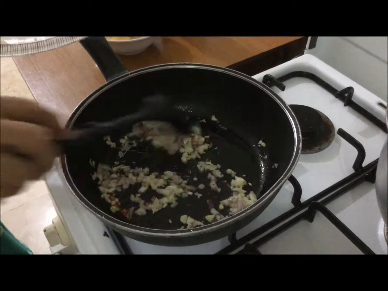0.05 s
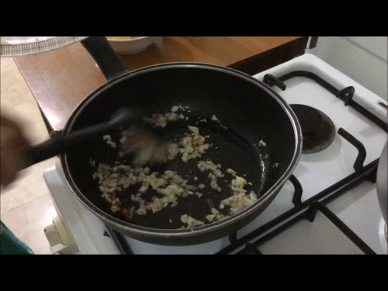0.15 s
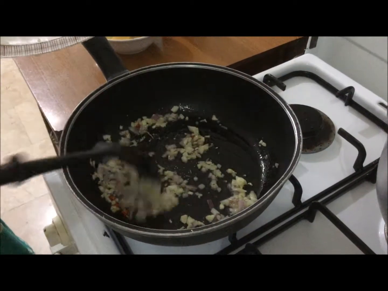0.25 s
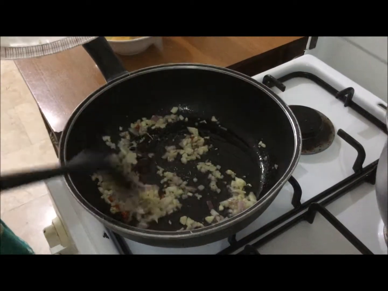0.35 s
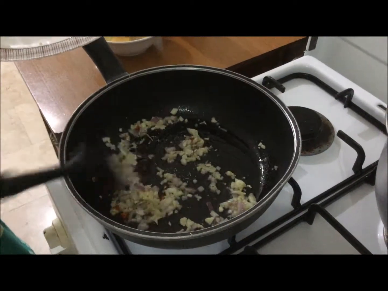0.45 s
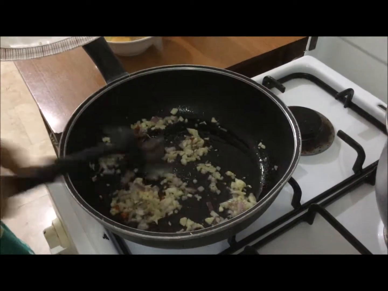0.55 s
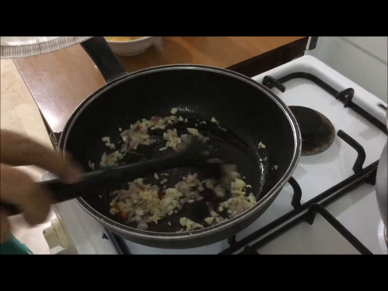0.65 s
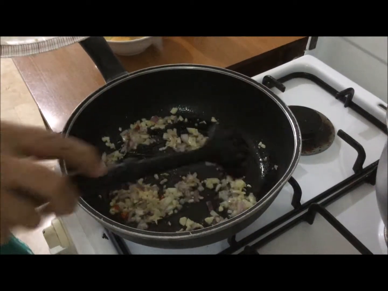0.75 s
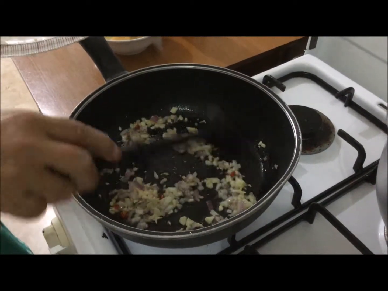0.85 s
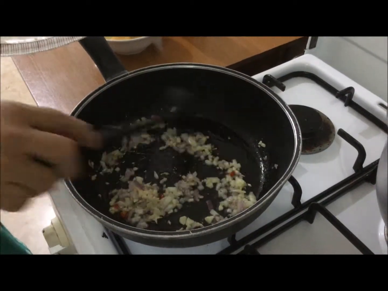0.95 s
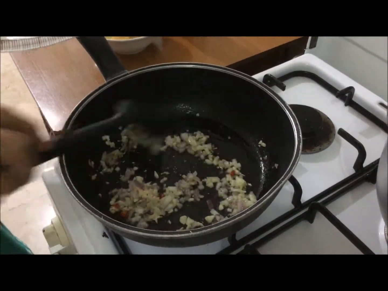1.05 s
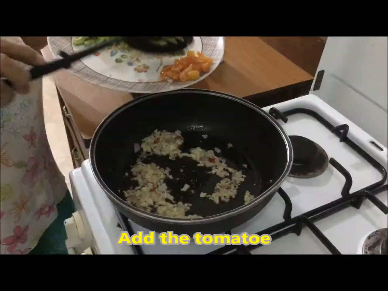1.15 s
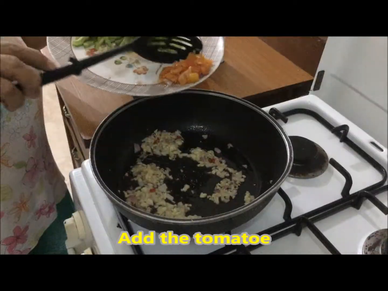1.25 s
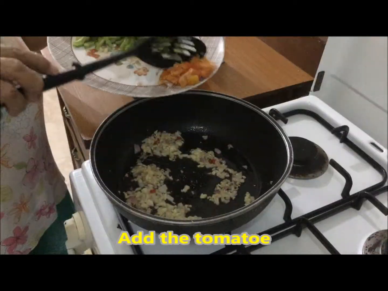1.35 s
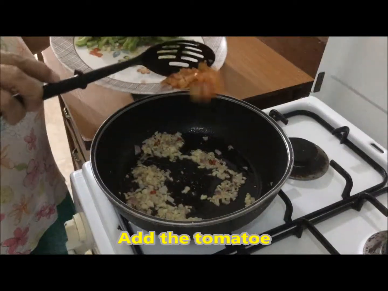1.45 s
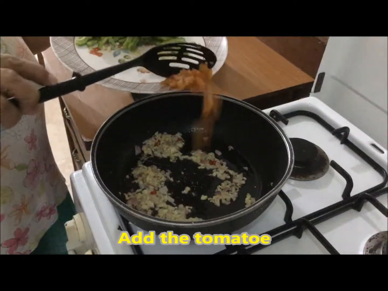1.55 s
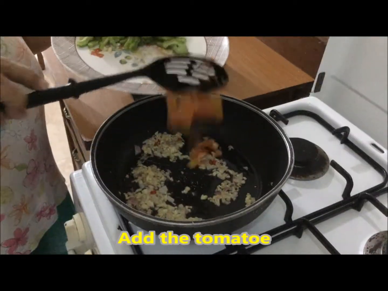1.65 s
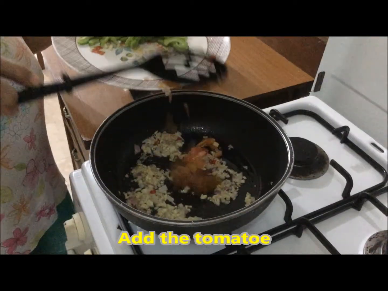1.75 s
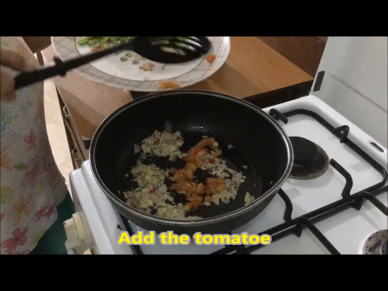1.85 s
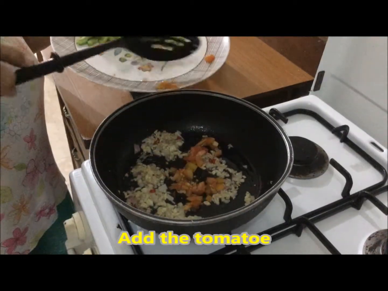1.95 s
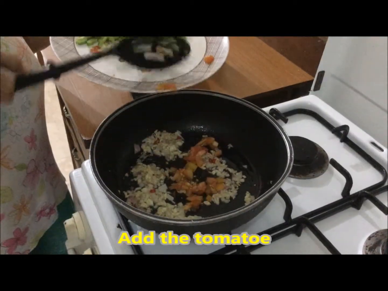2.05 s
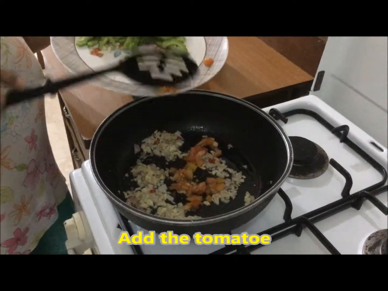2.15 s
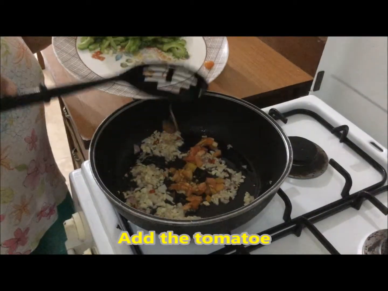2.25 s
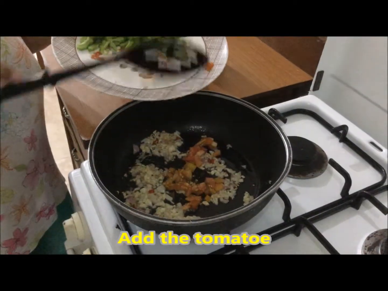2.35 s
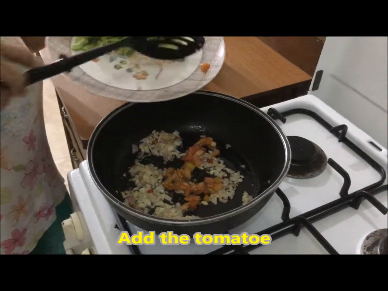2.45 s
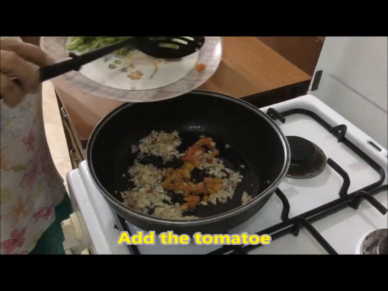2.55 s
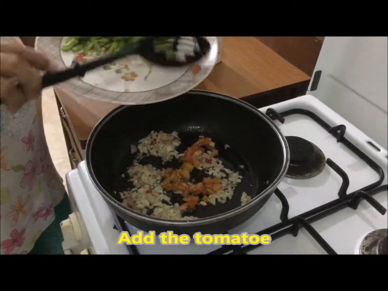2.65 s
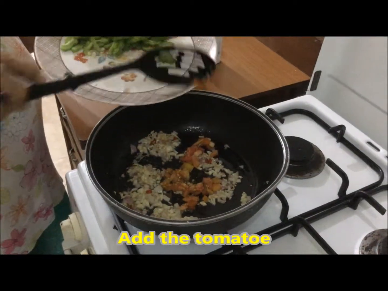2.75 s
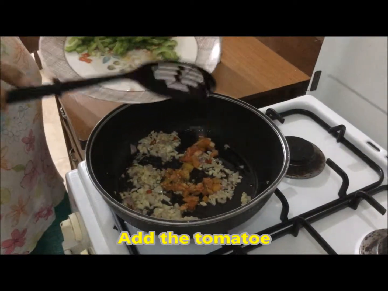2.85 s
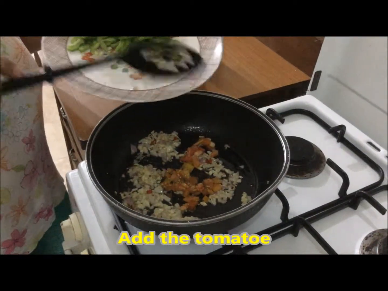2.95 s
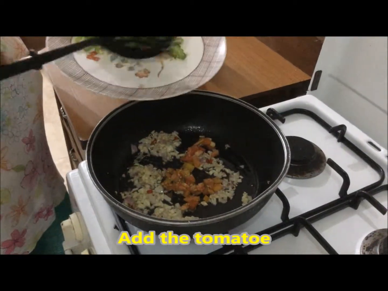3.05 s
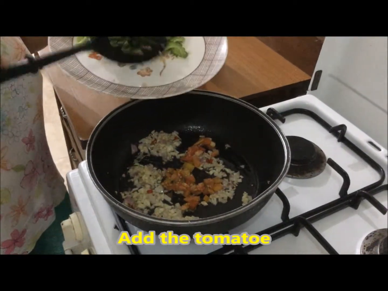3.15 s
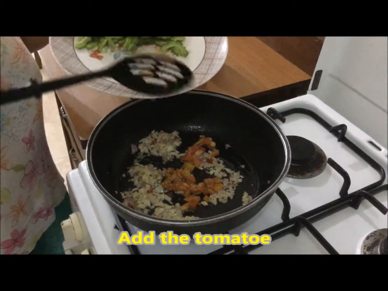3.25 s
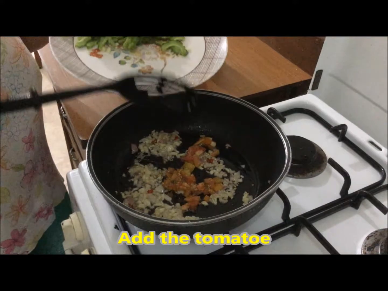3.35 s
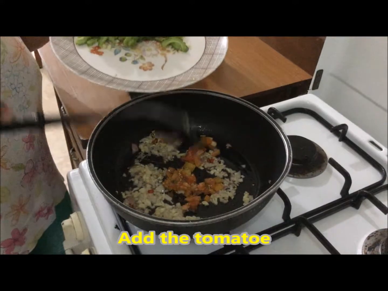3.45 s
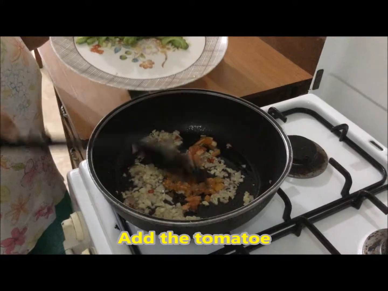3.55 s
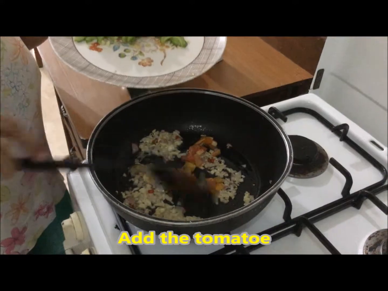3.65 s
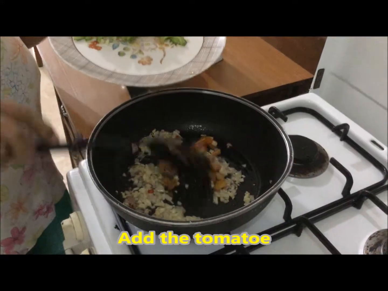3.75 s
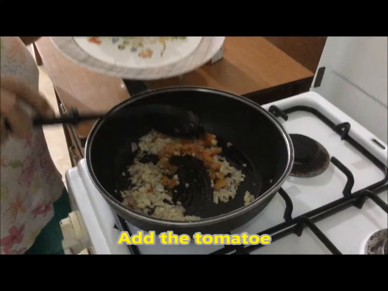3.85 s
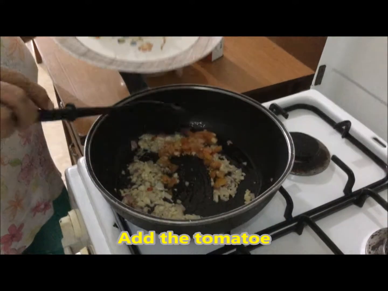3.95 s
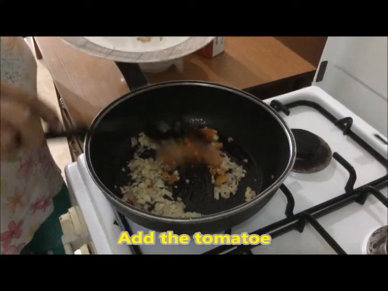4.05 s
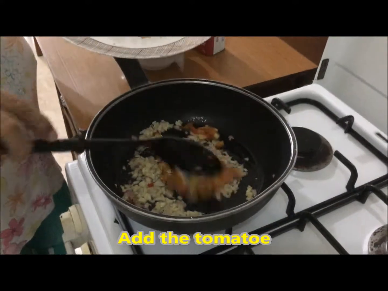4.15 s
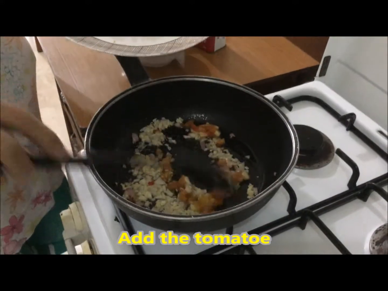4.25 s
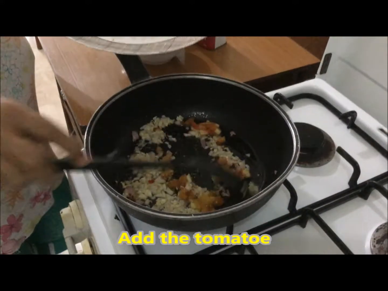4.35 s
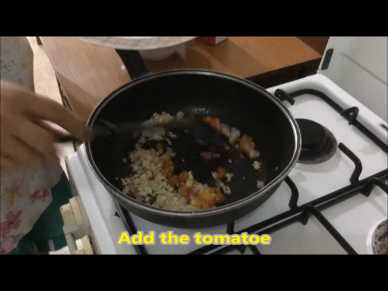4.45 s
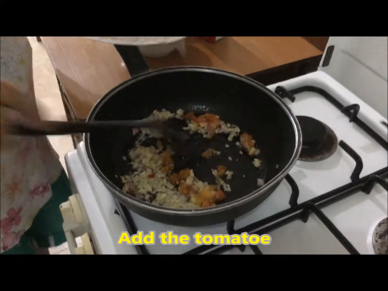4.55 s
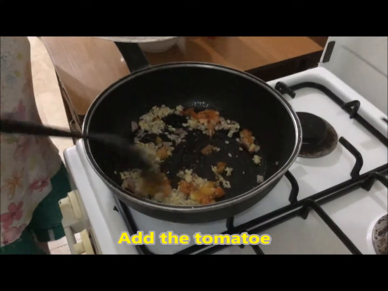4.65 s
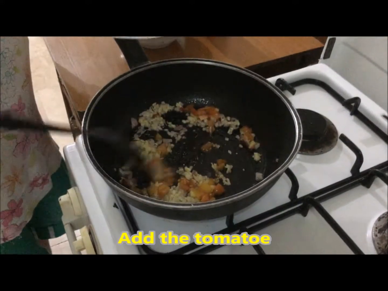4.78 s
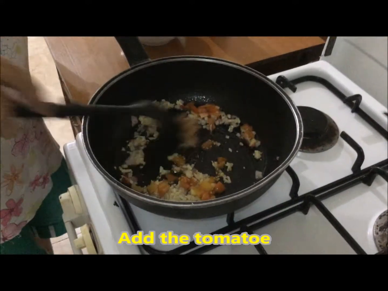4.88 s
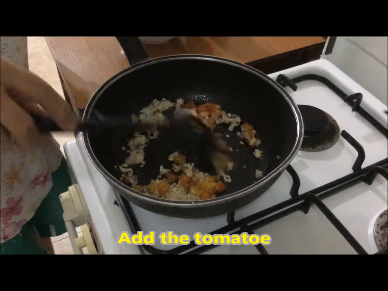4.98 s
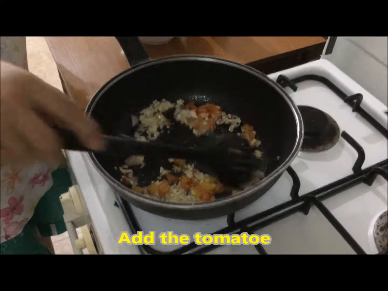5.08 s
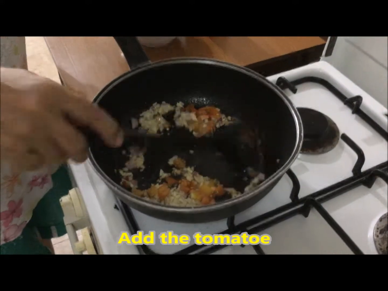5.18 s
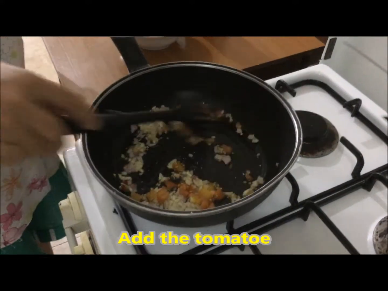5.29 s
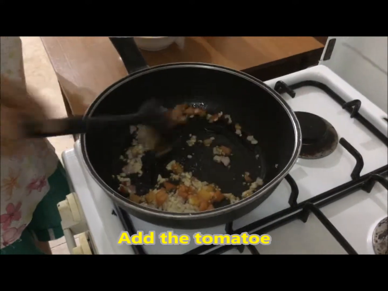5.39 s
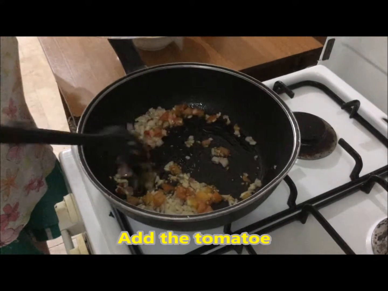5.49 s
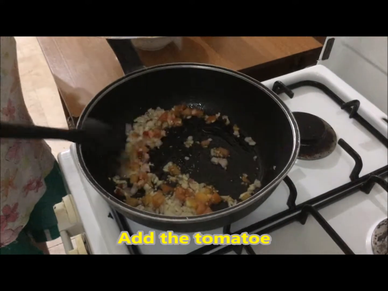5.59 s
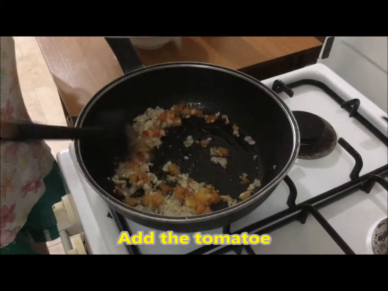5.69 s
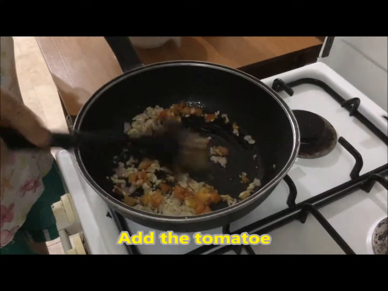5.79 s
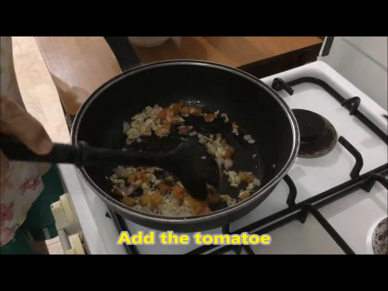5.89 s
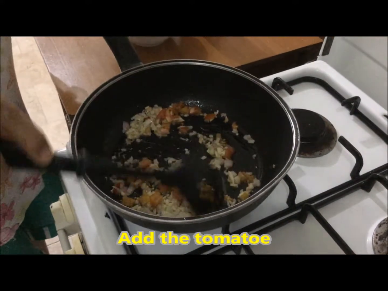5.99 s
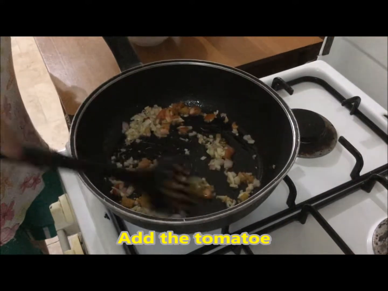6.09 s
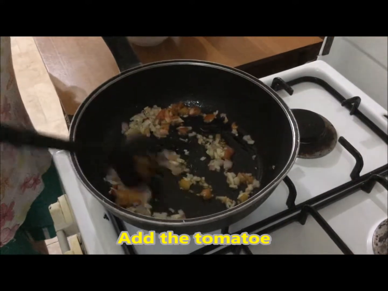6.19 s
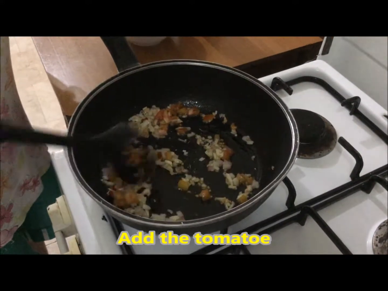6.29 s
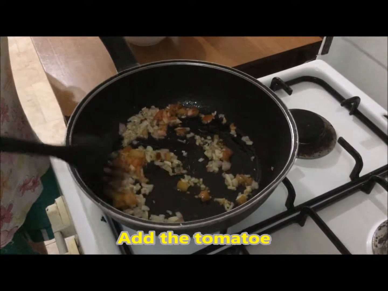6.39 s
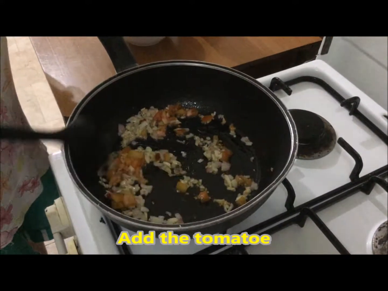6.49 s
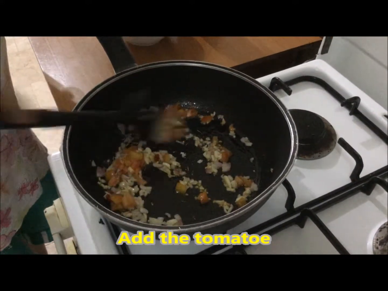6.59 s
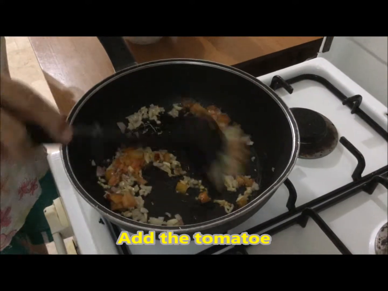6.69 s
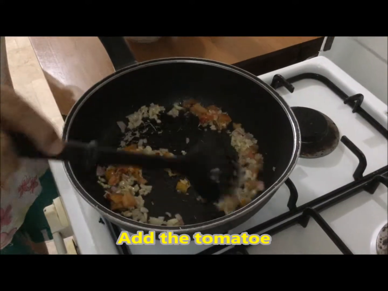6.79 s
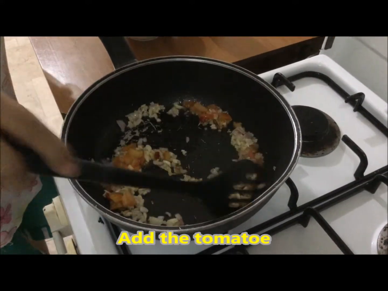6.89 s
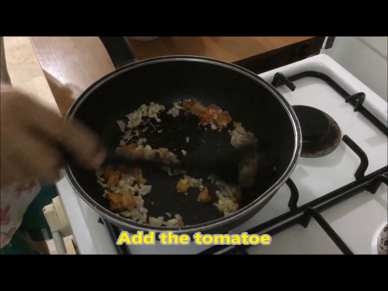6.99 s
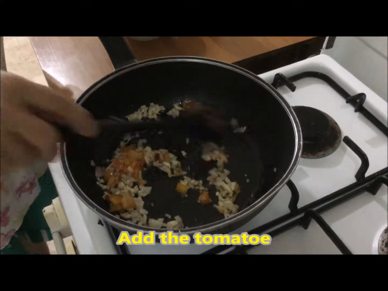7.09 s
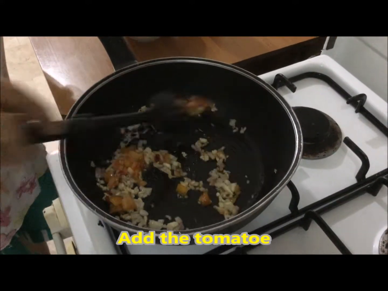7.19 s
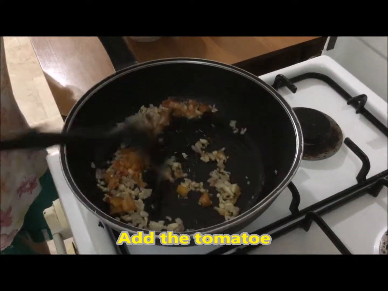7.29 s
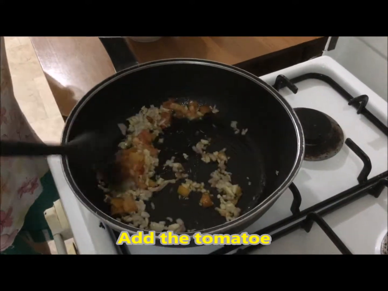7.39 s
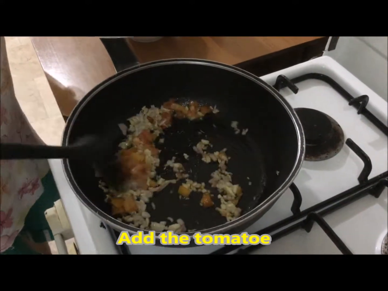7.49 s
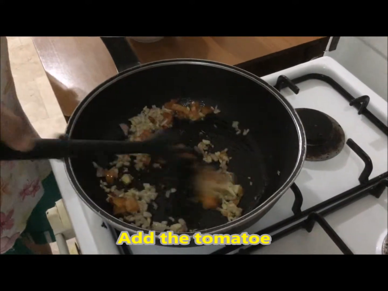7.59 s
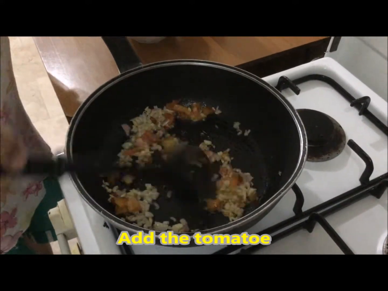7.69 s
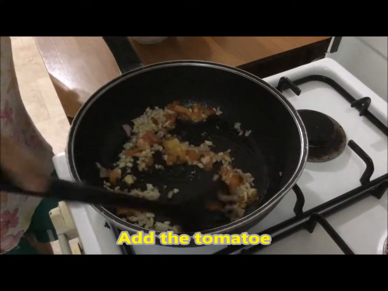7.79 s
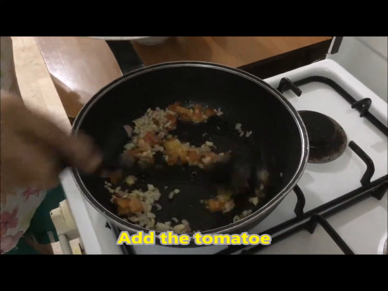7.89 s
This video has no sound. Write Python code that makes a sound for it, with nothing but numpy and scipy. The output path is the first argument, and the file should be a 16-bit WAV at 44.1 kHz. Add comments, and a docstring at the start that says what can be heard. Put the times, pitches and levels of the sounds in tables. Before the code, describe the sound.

Mono, close sound in a small home kitchen. From 0 s, onion and garlic sizzle finely in hot oil with bright, scattered spits; the spoon clacks at 0.5 s, and dull thuds and rubbing of the pan on its grate cluster around 0.9-1.1 s. At about 1.15 s sound almost vanishes, then stays thin and sparse, with a hard tap at 1.28 s. Around 1.9 s tomato lands: soft thuds, hollow juicy plops, and crackle rising again by 2.1 s, with a sharp knock there. Steady wet frying follows, another clack at 3.2 s and a cluster from 3.75 s. From 4 s the sizzle grows stronger, denser and crisper, fullest around 7 s, with loud snapping spits. Stirring knocks and grate scrapes come near 4.4, 4.8, 5.7, 6.5, 7.1 and 7.55 s. Faint low rumble swells beneath; tiny instants thin to watery tones. Frying continues to the end, near 8 s.

```python
"""Kitchen: chopped onion, garlic and tomato fry in hot oil in a deep pan; a plastic spoon stirs them.
Steam bubbles ring briefly as bright sizzle and crackle; juice burbles hollow, oil spits ring and crack.
The spoon strikes modes of the pan, which rubs on its grate; filtered noise rumbles below.
One microphone; now and then the sound thins to faint tones for an instant, and once it nearly stops."""
import sys
import numpy as np
from scipy import signal
from scipy.fft import rfft, irfft
from scipy.io import wavfile
from scipy.ndimage import uniform_filter1d

SR = 44100
rng = np.random.default_rng(int(sys.argv[2]) if len(sys.argv) > 2 else 0)


def boost_factor(decibels):
    """Convert a level in decibels to a linear amplitude factor."""
    exponent = np.asarray(decibels, float) / 20
    return 10 ** exponent


def file_out(sig):
    """Save sig as 16-bit WAV at sys.argv[1]."""
    # one column per channel
    cols = np.atleast_2d(sig).T
    # limit, then scale
    lim = np.clip(cols, -1, 1)
    pcm = np.round(lim * 32767).astype(np.int16)
    wavfile.write(sys.argv[1], SR, pcm)


N = 349713

# frying course: t/s, fine sizzle level/dB, juice burble level/dB
FRYING = [(0.0, -41, -56.5), (0.7, -41, -54), (0.95, -42.5, -61), (1.13, -41.5, -57), (1.19, -55.5, -67),
          (1.6, -55, -69), (1.9, -46.5, -59), (2.08, -47, -52.5), (2.56, -45, -50.5), (2.92, -43, -50),
          (3.12, -43.5, -48.5), (3.8, -41, -49), (4.2, -39, -46), (4.8, -35.5, -45.5), (5.1, -38.5, -45.5),
          (5.65, -35, -43.5), (6.1, -36.5, -44.5), (6.7, -36, -45.5), (6.95, -33.5, -43.5),
          (7.5, -34.5, -44.5), (7.93, -36, -46)]
# coarser crackle course: t/s, level/dB
CRACKLE_COURSE = [(0.0, -52), (0.62, -51), (0.99, -55.5), (1.1, -52), (1.3, -70.5), (1.72, -63),
                  (2.1, -53.5), (3.77, -49), (4.11, -45.5), (4.64, -45), (4.86, -44), (6.65, -44),
                  (6.93, -42), (7.35, -42), (7.93, -45)]
# spectra, relative density: f/Hz, level/dB (per Hz)
SIZZLE_SPECTRUM = [(3820, -29.5), (6500, -12), (7560, -11), (10100, -7), (13400, -1), (14700, -2),
                   (15700, -29.5)]
# as above, coarser crackle: f/Hz, level/dB (per Hz)
CRACKLE_SPECTRUM = [(1350, -25), (2300, -7.5), (2750, -8), (3040, 0.5), (3560, -2), (5200, -0.5),
                    (8500, -4), (11000, -31.5), (18700, -120)]
# as above, burble before the tomato lands: f/Hz, level/dB (per Hz)
ONION_SPECTRUM = [(250, -53), (420, -10.5), (550, -22), (635, -6), (704, -12), (850, -13.5), (1390, 2),
                  (2800, -4.5), (3640, -22), (6160, -120)]
# as above, burble once it has landed: f/Hz, level/dB (per Hz)
JUICE_SPECTRUM = [(250, -19), (420, -13), (469, -23), (591, -6.5), (768, -12), (1050, -10), (1110, -9.5),
                  (1330, -0.5), (1840, -5.5), (2550, -8.5), (2800, -11), (3640, -39), (6160, -120)]
# as above, pan rubbing on its grate: f/Hz, level/dB (per Hz)
GRATE_SPECTRUM = [(88, -33), (150, -4), (216, -2.5), (242, 9), (334, -20), (400, -2.5), (520, -70),
                  (880, -120)]
# spoon shoves the pan on its grate: start t/s, length/s, level/dB
SHOVES = [(0.0, 0.025, -65), (0.138, 0.11, -62), (0.59, 0.081, -55.5), (0.904, 0.061, -57),
          (1.037, 0.055, -66), (1.195, 0.086, -62.5), (1.32, 0.053, -66), (1.846, 0.093, -68),
          (2.116, .03, -64), (3.067, 0.04, -72), (3.187, 0.029, -67), (3.744, 0.12, -61), (4.4, 0.14, -56),
          (4.69, 0.037, -74), (4.82, 0.12, -51.5), (5.231, 0.044, -61), (5.73, 0.044, -55.5),
          (6.108, 0.053, -52.5), (6.475, 0.035, -54.5), (6.584, 0.077, -60), (6.733, 0.046, -63),
          (7.102, 0.036, -65), (7.4, 0.046, -69), (7.573, 0.058, -58), (7.9, 0.043, -54)]
# rumble noise bands: f/Hz, width/Hz, level/dB
RUMBLE_BANDS = [(74, 29, -65), (116, 55, -61.5), (180.5, 68, -70), (474, 19, -77.5), (760, 440, -72.5)]
# bass swells: centre t/s, width/s, lift of lowest band/dB, lift of next two/dB
SWELLS = [(0.09, 0.066, 2, 4), (0.95, 0.026, -2, 11), (1.95, 0.31, 10, 1.5), (2.9, 0.28, 7, 2.5),
          (3.87, 0.12, 7, 5.5), (4.5, 0.057, 11, 8), (4.97, 0.06, 17.5, -2), (5.87, 0.05, -10, 11),
          (6.85, 0.19, -3, 3), (7.11, 0.17, 7, 5), (7.65, 0.08, -8, 12), (7.76, 0.044, 10, 1),
          (7.92, 0.079, -9, 9)]
# large oil spits: t/s, peak level/dB, f/Hz, crack level/dB
SPITS = [(0.0529, -24, 12300, -47), (0.0607, -21, 12900, -57), (0.124, -27, 13400, -49),
         (0.2389, -28, 9400, -47), (0.2442, -25, 12100, -57), (0.2563, -30, 9500, -32),
         (0.3439, -14.5, 13000, -32), (0.3727, -19, 11400, -40), (0.3875, -26, 13000, -61),
         (0.4038, -22, 12600, -39), (0.4201, -23, 13000, -46), (0.4295, -31, 10300, -30),
         (0.4508, -26, 11700, -40), (0.4844, -21, 12400, -40), (0.5027, -21, 13400, -44),
         (0.5121, -20, 11700, -43), (0.5277, -22, 9800, -42), (0.6027, -25, 13000, -46),
         (0.6096, -23, 10700, -47), (0.6328, -25, 8500, -29), (0.6388, -25, 12700, -48),
         (0.6602, -25, 12000, -49), (0.7488, -24, 12300, -36), (0.8099, -15, 11900, -45),
         (0.9578, -26, 12000, -57), (1.1193, -24, 11600, -51), (1.2773, -45, 8600, -39),
         (1.2859, -29, 12800, -45), (1.6116, -35, 13500, -62), (1.6849, -24.5, 11800, -40.5),
         (1.7716, -34, 13000, -57), (1.8411, -33, 10800, -45), (1.8816, -32, 7060, -39),
         (1.8893, -38, 9200, -36), (1.917, -29, 12000, -62), (1.938, -39, 5500, -36),
         (1.9761, -33, 13600, -36), (2.0006, -33, 13100, -52), (2.0128, -39, 5600, -42),
         (2.0499, -40, 8900, -45), (2.0566, -22, 11700, -38), (2.0821, -38, 10900, -36),
         (2.0962, -25, 12600, -51), (2.1036, -30, 12700, -56), (2.1147, -32, 9200, -40),
         (2.1343, -28, 12400, -57), (2.2303, -29, 13100, -53), (2.2358, -30, 11900, -51),
         (2.2509, -30, 10600, -33), (2.2692, -29, 10100, -27), (2.2849, -28, 13100, -41),
         (2.335, -27, 11200, -43), (2.3973, -34, 9800, -57), (2.4273, -32, 9400, -50),
         (2.456, -22, 11800, -56), (2.4751, -28, 11000, -43), (2.4879, -31, 11100, -40),
         (2.5303, -40, 8800, -35), (2.5676, -30, 11200, -39), (2.6516, -28, 11700, -47),
         (2.7214, -27, 11300, -32), (2.7425, -27, 12100, -41), (2.7613, -30, 11800, -56),
         (2.7764, -30, 13700, -51), (2.816, -30, 11800, -46), (2.8303, -25, 11100, -38),
         (2.872, -29, 12200, -34), (2.88, -27, 11700, -55), (2.9162, -31, 13000, -54),
         (2.9376, -27, 12500, -47), (2.9609, -21, 11900, -53), (2.9716, -28, 12800, -33),
         (2.9952, -28, 12300, -59), (3.0047, -24, 11200, -50), (3.0282, -29, 12700, -48),
         (3.0355, -24, 11100, -48), (3.0538, -25, 12900, -38), (3.1131, -26, 12200, -47),
         (3.1796, -26, 10000, -43), (3.1954, -31, 9900, -37), (3.2204, -17, 11000, -31),
         (3.2331, -25, 11500, -43), (3.2726, -24, 13000, -43), (3.2813, -23, 12800, -45),
         (3.3008, -26, 13200, -55), (3.3194, -28, 9500, -42), (3.3806, -26, 12900, -51),
         (3.3972, -16, 12900, -32), (3.4448, -26, 9500, -35), (3.452, -22, 10200, -36),
         (3.4567, -28, 12800, -51), (3.4959, -32, 6600, -35), (3.5396, -21, 11300, -43),
         (3.5507, -26, 12000, -41), (3.558, -25, 12800, -40), (3.5871, -23, 11500, -47),
         (3.5944, -23, 12600, -48), (3.6257, -25, 11900, -52), (3.6382, -20, 12300, -37),
         (3.6517, -24, 13400, -47), (3.6593, -25, 13300, -56), (3.6777, -26, 11600, -47),
         (3.6921, -23, 11200, -42), (3.7337, -25, 11700, -45), (3.7501, -35, 8700, -39),
         (3.7964, -21, 12100, -58), (3.8136, -27, 9600, -32), (3.8421, -26, 6700, -30),
         (3.891, -20, 10800, -39), (3.9449, -27, 11800, -51), (3.994, -21, 8400, -45),
         (4.0186, -22, 11100, -53), (4.028, -25, 11300, -38), (4.0356, -24, 10400, -47),
         (4.074, -19, 12100, -46), (4.0908, -14, 12300, -28), (4.1527, -24, 8800, -39),
         (4.159, -22, 8800, -28), (4.2072, -19, 11600, -44), (4.213, -26, 12800, -45),
         (4.2276, -25, 12100, -48), (4.2588, -26, 13200, -44), (4.2907, -27, 12900, -44),
         (4.3166, -23, 9600, -34), (4.4135, -25, 9000, -29.5), (4.4418, -22, 7350, -40),
         (4.547, -25, 12800, -46), (4.5734, -18, 11800, -34), (4.6432, -20, 12200, -37),
         (4.6591, -27, 7900, -34), (4.6828, -14, 11400, -35), (4.707, -20, 12500, -44),
         (4.7552, -21, 12400, -50), (4.7686, -11.5, 10800, -36), (4.8158, -19, 12800, -40),
         (4.8579, -22, 12900, -39), (4.8683, -21, 12700, -50), (4.8832, -23, 13300, -47),
         (4.9053, -17, 12800, -38), (4.9182, -19, 12300, -46), (4.9407, -21, 12800, -41),
         (4.9745, -15, 11700, -30), (5.008, -22, 6450, -38), (5.0417, -23, 13200, -43),
         (5.0506, -17, 12700, -44), (5.0893, -27.5, 7200, -32), (5.0952, -31, 5400, -27),
         (5.123, -23, 11700, -51), (5.1651, -20, 12000, -28), (5.1801, -18, 13200, -50),
         (5.3977, -24, 11100, -44), (5.5651, -20, 11800, -38), (5.576, -16, 11900, -38),
         (5.637, -21, 12300, -34), (5.7154, -25, 12800, -50), (5.7571, -23, 12900, -40),
         (5.7929, -23, 11700, -39), (5.9459, -19, 11900, -46), (5.9994, -26, 12900, -47),
         (6.0439, -26, 11800, -38), (6.0558, -28, 13200, -49), (6.0895, -22, 9500, -39),
         (6.1148, -16, 12300, -45), (6.1967, -21, 12700, -45), (6.3239, -18, 11800, -46),
         (6.3791, -13, 11100, -24), (6.4139, -19, 12000, -26), (6.4293, -12, 12300, -46),
         (6.4571, -19, 13000, -45), (6.5312, -28, 13100, -42), (6.5678, -22, 10800, -37),
         (6.6048, -22, 12700, -41), (6.6467, -24, 12200, -36), (6.6646, -23, 13200, -50),
         (6.6827, -21, 11600, -40), (6.9589, -15, 11800, -49), (7.0032, -20, 12900, -40),
         (7.0375, -21, 12800, -43), (7.0472, -19, 12900, -34), (7.078, -20, 12500, -50),
         (7.2362, -17, 13400, -41), (7.5068, -24, 12600, -49), (7.5883, -15, 12160, -44),
         (7.6176, -23, 13300, -51), (7.6323, -19, 13060, -47), (7.7034, -18, 12900, -45),
         (7.7125, -20, 12200, -41), (7.8341, -19, 11800, -41), (7.8967, -19, 13200, -37)]
# thinning to a few faint tones: start t/s, length/s, depth level/dB
THINNING = [(0.083, 0.012, -20), (0.3, 0.034, -55), (0.722, 0.015, -16), (0.916, 0.012, -19),
            (1.322, 0.011, -18), (1.666, 0.013, -45), (1.79, 0.015, -19), (2.174, 0.013, -25),
            (3.346, 0.015, -24), (3.708, 0.017, -19), (3.775, 0.015, -18), (4.499, 0.016, -21),
            (4.776, 0.014, -28), (5.1, 0.011, -18), (5.416, 0.013, -21), (5.544, 0.01, -19),
            (5.61, 0.012, -17), (5.65, 0.011, -19), (5.972, 0.011, -21), (6.506, 0.011, -21),
            (6.549, 0.007, -19), (6.698, 0.013, -20), (7.635, 0.013, -21)]
# big juice bubbles: t/s, peak level/dB, f/Hz
PLOPS = [(0.4284, -34, 2600), (0.7486, -30, 3080), (1.868, -47, 1050), (1.8881, -33, 2460),
         (2.0333, -36.5, 1320), (2.045, -38, 1420), (2.0774, -34, 1520), (2.1034, -45, 1600),
         (2.2335, -38, 1260), (2.3487, -29, 1350), (2.5296, -33.5, 1320), (2.6394, -33, 1430),
         (2.7216, -29, 1510), (2.9707, -27.5, 1490), (3.269, -34, 1290), (3.4946, -34, 1340),
         (3.534, -31, 1350), (4.351, -26, 1600), (4.5683, -35, 1330), (4.7525, -32, 1280),
         (5.858, -44, 597), (6.0881, -31, 1720), (6.2208, -30, 1460), (6.3104, -28, 1370),
         (6.4676, -29, 1590), (6.5246, -31, 2020), (6.6172, -28, 1400), (7.418, -38.5, 626),
         (7.8096, -32, 1420)]
# spoon on pan or plate: t/s, level/dB, thud level/dB, thud f/Hz, loudest ring f/Hz, fall-off/(dB/octave)
KNOCKS = [(0.507, -32, -51.5, 320, 940, 33), (0.894, -39.5, -35.5, 235, 850, 13),
          (0.93, -54, -31, 198, 818, 10), (0.958, -60, -40, 204, 1000, 10),
          (0.988, -56, -35.5, 217, 1030, 11), (1.051, -48, -40.5, 260, 1000, 6),
          (1.065, -50, -48, 290, 1000, 9), (1.093, -42.5, -39, 230, 1900, 13),
          (1.182, -64, -46.5, 306, 600, 16), (1.202, -75, -51, 300, 600, 14),
          (1.276, -37, -76, 317, 1910, 6.5), (1.855, -62, -39, 190, 800, 10),
          (1.89, -65, -41, 190, 800, 10), (2.113, -30, -50, 303, 1350, 12),
          (3.192, -28.5, -45.5, 295, 1140, 14), (3.219, -38, -66, 293, 1390, 12),
          (3.747, -34, -47, 260, 1380, 10), (3.7475, -29, -70, 260, 2230, 42),
          (3.788, -50, -35, 197, 1300, 12), (3.858, -55, -49, 239, 1300, 10),
          (3.888, -60, -50, 225, 1300, 10), (3.8126, -51, -60, 250, 1390, 7),
          (3.758, -41, -50, 250, 1900, 8), (4.397, -33.5, -58, 199, 1300, 0),
          (4.405, -38, -56, 300, 610, 16), (4.412, -30, -60, 305, 1040, 34),
          (4.427, -48, -46, 300, 1040, 20), (4.827, -39, -47.5, 276, 756, 18),
          (4.85, -42, -47, 269, 600, 12), (5.735, -39, -38, 205, 853, 0), (6.484, -38, -42, 238, 700, 2),
          (6.497, -55, -45.5, 300, 700, 10), (6.582, -33.5, -39, 216, 1040, 21),
          (7.104, -41, -50, 316, 624, -2), (7.1169, -30.5, -60, 300, 1900, 11),
          (7.1275, -41, -72, 303, 1300, 8), (7.563, -51, -33.5, 221, 1250, 15)]
# pan and spoon modes: f/Hz, level/dB, t60/s
PAN_MODES = [(575, 4, 0.023), (800, 0, 0.036), (920, -2.5, 0.032), (1040, -7, 0.055), (1280, 2.5, 0.025),
             (1410, 1, 0.023), (1680, -5, 0.02), (1860, -2, 0.018), (2230, -1, 0.014), (2600, -8, 0.026),
             (2860, -2.5, 0.021), (3600, -5, 0.027), (4100, -4, 0.012)]
# low pan modes: f/Hz, level/dB, t60/s
THUD_MODES = [(190, -6, 0.14), (228.6, -5, 0.1), (301.8, 6, 0.074), (475, -6.5, 0.16)]
# near silence: start t/s, end t/s, depth level/dB
NEAR_SILENCE = (1.146, 1.184, -32)

TOMATO_LANDS_S = 1.87
SHOVE_RISE_S, SHOVE_T60_S, GRATE_REST_DB = 0.01, 0.39, -70.5
SCRAPE_DB = -9   # first five pan modes, against the unringing rub
RUMBLE_WAVER_DB = 2   # rms
SPIT_TOP_HZ, SPIT_SPREAD_OCTAVES = 13500, 0.7   # small spits: exponential spread below the top
SMALL_SPIT_DB, SMALL_CRACK_DB = 4, -20   # least over the sizzle before the pitch tilt; mean crack re that
KITCHEN_T60_S, KITCHEN_DB = 0.2, -13
TONES_DB, TONES_FLOOR_DB = 4, -3   # tone boost when thinned; most the tones then sink
BASS_SPARED_DB, BASS_HZ = 18.0, 400
KNOCK_CRACK_DB = -11   # crack rms at its start, re knock level


def rms_one(x):
    """Scale to rms 1."""
    return x / np.sqrt(np.mean(x ** 2) + 1e-20)


def in_time(rows):
    """Interpolate each column linearly through time."""
    s, *columns = np.transpose(rows)
    return [np.interp(np.arange(N) / SR, s, c) for c in columns]


def colour(x, spectrum):
    """Causal minimum-phase filter, by folded cepstrum, with the given spectrum; rms 1."""
    size = 8192
    hz, db = np.transpose(spectrum)
    grid_hz = np.arange(size // 2 + 1) * SR / size + 1
    gain_db = np.interp(np.log(grid_hz), np.log(hz), db)
    cepstrum = irfft(np.log(boost_factor(gain_db)))
    cepstrum[1:size // 2] *= 2
    cepstrum[size // 2 + 1:] = 0
    impulse = irfft(np.exp(rfft(cepstrum)))
    return rms_one(signal.fftconvolve(x, impulse)[:N])


def drift(rate_hz):
    """Slow random wander, rms 1: noise through a double pole at 1/20 of the sample rate."""
    r = np.exp(-40 * np.pi * rate_hz / SR)
    noise = rng.standard_normal(N // 20 + 3002)
    slow = signal.lfilter([1], [1, -2 * r, r * r], noise)[3000:]   # settled part
    return np.interp(np.arange(N) / 20, np.arange(len(slow)), rms_one(slow - slow.mean()))


def ring(clicks, hz, t60_s):
    """Two-pole resonator: a unit click starts a decaying sine of height 1."""
    r = boost_factor(-60 / (t60_s * SR))
    w = 2 * np.pi * hz / SR
    return signal.lfilter([0, np.sin(w)], [1, -2 * r * np.cos(w), r * r], clicks + 1e-18)


def uneven_boil_db():
    """Shared spurts and lulls that drive bubbles of all sizes."""
    return 1.1 * drift(8.2) + 0.55 * drift(30.0) + drift(150.0)


def bursting(spectrum, per_s, boil_db, cycles, spread_db, hiss_db, patchy_db=4.5, count=9):
    """Bubbles burst at random; each rings at its size's pitch (t60 in cycles), each size in its own spurts."""
    loudness_db = spread_db * np.minimum(rng.exponential(1, N), 2.6)
    clicks = boost_factor(loudness_db) * rng.choice([-1, 1], N)
    activity = boost_factor(boil_db + 0.82 * drift(9.0))
    born = rng.random(N) < per_s * activity / SR
    pitches_hz = np.geomspace(spectrum[1][0], min(spectrum[-2][0], 0.34 * SR), count)
    dealt = rng.integers(0, count, N)
    grains = np.zeros(N)
    for k, hz in enumerate(pitches_hz):
        spurts = boost_factor(patchy_db * drift(32.0))
        rings = ring(clicks * born * (dealt == k), hz, cycles / hz)
        grains += np.sqrt(hz) * rms_one(spurts * rings)
    hiss = boost_factor(hiss_db) * np.sqrt(activity) * rng.standard_normal(N)
    return colour(rms_one(grains) + hiss, spectrum)


def sizzle(level_db, boil_db):
    """Tiny steam bubbles: dense, short, bright rings in hiss."""
    fine = bursting(SIZZLE_SPECTRUM, 1300.0, 1.5 * boil_db, cycles=4.9, spread_db=3.5, hiss_db=4.5)
    return boost_factor(level_db + 0.31 * drift(0.87)) * fine


def crackle(level_db, boil_db):
    """Coarser crackle: sparser bursts with longer rings."""
    uneven_db = boil_db + 2.0 * drift(40.0)
    coarse = bursting(CRACKLE_SPECTRUM, 500.0, uneven_db, cycles=70.0, spread_db=1.5, hiss_db=6.5, count=16)
    return boost_factor(level_db) * coarse


def juice(level_db, boil_db):
    """Hollow burble of boiling juice; its colour and bursts change as the tomato lands."""
    landed = np.clip((np.arange(N) / SR - TOMATO_LANDS_S) / 0.018, 0, 1)
    tomato = bursting(JUICE_SPECTRUM, 450.0, 1.4 * boil_db, cycles=7.0, spread_db=1.0, hiss_db=10.0)
    onion = bursting(ONION_SPECTRUM, 550.0, 2.8 * boil_db, cycles=1.2, spread_db=5.0, hiss_db=9.5)
    return boost_factor(level_db) * (landed * tomato + (1 - landed) * onion)


def shoving():
    """Rubbing amplitude: each shove rises fast, holds and dies away over a faint steady rub."""
    t = np.arange(N) / SR
    level = np.full(N, boost_factor(GRATE_REST_DB))
    for start_s, length_s, db in SHOVES:
        fall_db = -60 * np.clip(t - start_s - length_s, 0, 1) / SHOVE_T60_S
        rise = np.clip((t - start_s) / SHOVE_RISE_S + 1, 0, 1)
        level = level + rise * boost_factor(db + fall_db)
    return level


def grate():
    """Pan rocks on its grate: lumpy rubbing noise, part of it ringing the pan modes; rms 1."""
    rubbing = rng.standard_normal(N) * boost_factor(4.9 * drift(43.0))
    ringing = rms_one(sum(boost_factor(db) * ring(rubbing, hz, t60_s) for hz, db, t60_s in THUD_MODES))
    scraping = rms_one(sum(boost_factor(db) * ring(rubbing, hz, t60_s) for hz, db, t60_s in PAN_MODES[:5]))
    return rms_one(colour(rubbing, GRATE_SPECTRUM) + boost_factor(2.0) * ringing + boost_factor(SCRAPE_DB) * scraping)


def rumble():
    """Distant traffic and appliances: band-passed noise, wavering and swelling."""
    out, t = np.zeros(N), np.arange(N) / SR
    centre_s, width_s, deep_db, upper_db = np.transpose(SWELLS)
    humps = np.exp(-((t[::100, None] - centre_s) / width_s) ** 2)
    no_lift_db = 0 * upper_db
    lifts_db = [deep_db, upper_db, upper_db, no_lift_db, no_lift_db]
    for (hz, width_hz, db), lift_db in zip(RUMBLE_BANDS, lifts_db):
        edges_hz = [hz - width_hz / 2, hz + width_hz / 2]
        band = signal.butter(2, edges_hz, "band", fs=SR, output="sos")
        noise = signal.sosfilt(band, rng.standard_normal(N + SR))[SR:]
        swell_db = np.interp(t, t[::100], humps @ lift_db) + RUMBLE_WAVER_DB * drift(11.0)
        out += boost_factor(db + swell_db) * rms_one(noise)
    return out


def pops(rows, cycles, crack_t60_s):
    """Short decaying sine per row (t60 in cycles of its pitch); rows with a crack level add a noise burst."""
    out, t = np.zeros(N + 400), np.arange(400) / SR
    band = signal.butter(2, [2500, 9000], "band", fs=SR, output="sos")
    grit = signal.sosfilt(band, rng.standard_normal((len(rows), 400)))
    for (s, db, hz, *crack_db), noise in zip(rows, grit):
        onset = 1 - np.exp(-1.5 * hz * t)
        note = np.sin(2 * np.pi * hz * t) * onset * boost_factor(-60 * t * hz / cycles)
        pop = boost_factor(db) * note / np.abs(note).max()
        crack = noise * boost_factor(-60 * t / crack_t60_s)
        pop += sum(boost_factor(c) for c in crack_db) * crack / np.abs(crack).max()
        out[round(s * SR):][:400] += pop
    return out[:N]


def spits(sizzle_db, count=300):
    """Oil drops ring at the pitch of their size: listed large ones, random small ones following the sizzle."""
    s, size, grit, width = rng.random((count, 4)).T
    s = s * (N - 500) / SR
    peak_db = sizzle_db[(s * SR).astype(int)] + SMALL_SPIT_DB + 6.3 * size ** 2
    octaves = -SPIT_SPREAD_OCTAVES * np.log(1 - 0.95 * width)
    crack_db = peak_db + SMALL_CRACK_DB - 2.6 * (grit - 0.5)
    small = np.transpose([s, peak_db - 9.0 * octaves, SPIT_TOP_HZ * 2 ** -octaves, crack_db])
    return pops(np.vstack([SPITS, small]), cycles=10.6, crack_t60_s=0.014)


def kitchen(x):
    """Diffuse tail: convolution with dying noise, duller than the source."""
    t = np.arange(int(0.4 * SR)) / SR
    tail = rng.standard_normal(len(t)) * boost_factor(-60 * t / KITCHEN_T60_S) * (t > 0.004)
    tail = signal.lfilter([1], [1, -0.5], tail)
    return signal.fftconvolve(x, tail / np.sqrt(np.sum(tail ** 2)))[:N]


def thin_out(x, edge_s=0.004, reach_s=0.015, count=14):
    """Sound sinks for an instant; the bass and the lines standing highest over their neighbours sink less."""
    bass = signal.sosfiltfilt(signal.butter(2, BASS_HZ, fs=SR, output="sos"), x)
    out, upper = x.copy(), x - bass
    for start_s, length_s, depth_db in THINNING:
        a, b = round((start_s - reach_s) * SR), round((start_s + length_s + reach_s) * SR)
        t = np.arange(b - a) / SR
        inside_s = np.minimum(t, t[::-1])
        fade = np.sin(np.pi / 2 * np.clip((inside_s - reach_s + edge_s) / (2 * edge_s), 0, 1)) ** 2
        lines = rfft(upper[a:b] * np.hanning(b - a))
        hz = np.arange(len(lines)) * SR / (b - a)
        neighbours = uniform_filter1d(np.abs(lines), size=31)
        standing = np.abs(lines) / neighbours ** 0.7 * (hz > 500)
        survive = np.zeros(len(lines))
        survive[np.argsort(standing)[-count:]] = 1
        tones = boost_factor(TONES_DB) * 2 * irfft(lines * survive, b - a) * np.clip(inside_s / reach_s, 0, 1)
        spared = boost_factor(min(depth_db + BASS_SPARED_DB, 0))
        out[a:b] = upper[a:b] * (boost_factor(depth_db) + (1 - boost_factor(depth_db)) * (1 - fade))
        out[a:b] += bass[a:b] * (1 - fade * (1 - spared))
        out[a:b] += tones * max(spared, boost_factor(TONES_FLOOR_DB))
    return out


def plops():
    """Big juice bubbles: short low rings without crack."""
    return pops(PLOPS, cycles=5.8, crack_t60_s=0.003)


def spoon(contact_s=0.0021, crack_t60_s=0.054):
    """Knock: tick, two bounces, fainter clatter and crack; the spot struck favours modes near one pitch."""
    s, db, thud_db, thud_hz, ring_hz, slope_db = np.transpose(KNOCKS)
    steps = rng.random((len(s), 6)) * [-0.5, 2.5, 2.0, 5.5, 5.5, 4.5]
    delays_s = np.cumsum(steps, axis=1) * contact_s
    at = np.round((s[:, None] + 0.0011 + delays_s) * SR).astype(int)
    bounces = boost_factor([0, -10, -13, -12, -15, -18])
    levels_db = [db + mode_db - 2.0 - slope_db * np.abs(np.log2(hz / ring_hz))
                 for hz, mode_db, _ in PAN_MODES]
    levels_db += [thud_db + mode_db - 43.6 * np.abs(np.log2(hz / thud_hz))
                  for hz, mode_db, _ in THUD_MODES]
    signs = (-1) ** np.arange(len(levels_db))   # neighbouring modes start in opposite directions
    out = np.zeros(N)
    for (hz, _, t60_s), strength_db, sign in zip(PAN_MODES + THUD_MODES, levels_db, signs):
        force = np.zeros(N)
        force[at] = bounces * (sign * boost_factor(strength_db))[:, None]
        out += ring(force, hz, t60_s)
    t = np.arange(900) / SR
    band = signal.butter(1, [1300, 6500], "band", fs=SR, output="sos")
    grit = rms_one(signal.sosfilt(band, rng.standard_normal((len(s), 900))))
    crack = boost_factor(db + KNOCK_CRACK_DB)[:, None] * grit * boost_factor(-60 * t / crack_t60_s)
    out[at[:, :1] + np.arange(900)] += crack
    return out


def near_silence():
    """Gain curve: the level drops almost to nothing once, briefly."""
    start_s, end_s, depth_db = NEAR_SILENCE
    corners_s = [start_s - 0.004, start_s, end_s - 0.002, end_s]
    return np.interp(np.arange(N) / SR, corners_s, [1, boost_factor(depth_db), boost_factor(depth_db), 1])


def scene():
    """Mix frying, hits with kitchen tail, grate and rumble; same on both sides."""
    sizzle_db, juice_db = in_time(FRYING)
    crackle_db, = in_time(CRACKLE_COURSE)
    boil_db = uneven_boil_db()
    frying = sizzle(sizzle_db, boil_db) + crackle(crackle_db, boil_db) + juice(juice_db, boil_db)
    hits = spits(sizzle_db) + plops() + spoon()
    pan = frying + hits + boost_factor(KITCHEN_DB) * kitchen(hits)
    return np.tile(pan + shoving() * grate() + rumble(), (2, 1))


def roll_off(x):
    """The treble ends steeply here."""
    return signal.sosfilt(signal.butter(12, 15820, fs=SR, output="sos"), x)


def record(dry):
    """One channel, thinned in places, cut at top and bottom, copied to both sides."""
    mono = thin_out(dry[0] * near_silence())
    low_pass = signal.cheby2(12, 60, 15900, fs=SR, output="sos")
    high_pass = signal.butter(2, 42.0, "high", fs=SR, output="sos")   # small microphone, no deep bass
    mono = signal.sosfilt(high_pass, signal.sosfilt(low_pass, mono))
    return roll_off(np.tile(mono, (2, 1)))


dry = scene()
out = record(dry)
file_out(out)
```